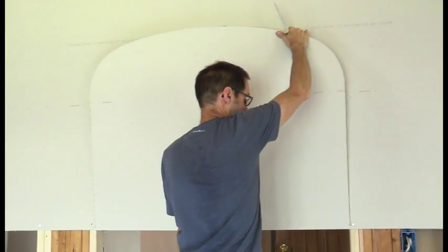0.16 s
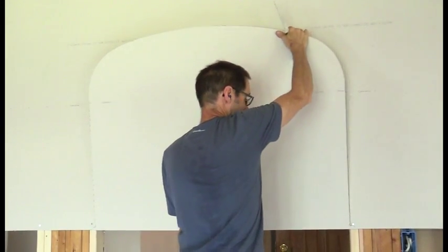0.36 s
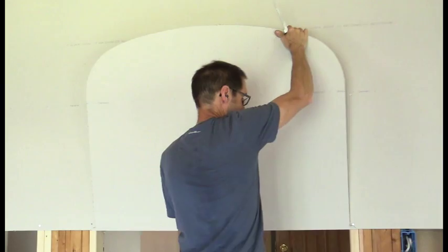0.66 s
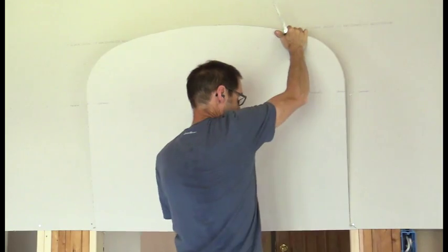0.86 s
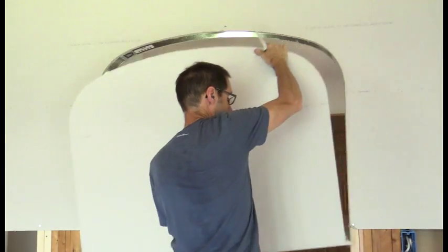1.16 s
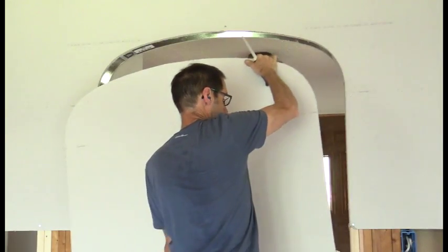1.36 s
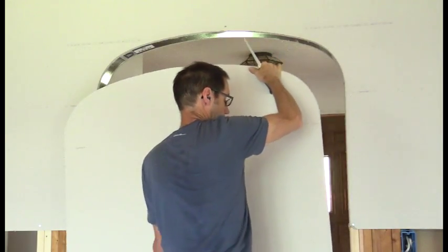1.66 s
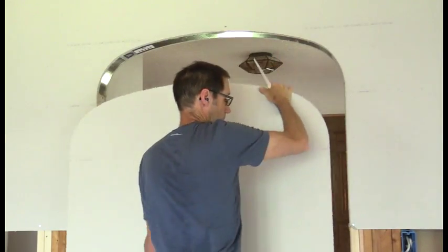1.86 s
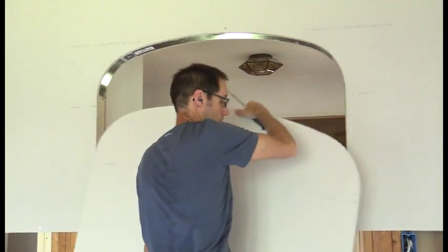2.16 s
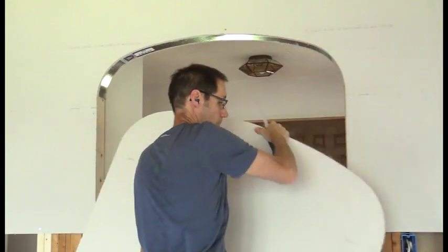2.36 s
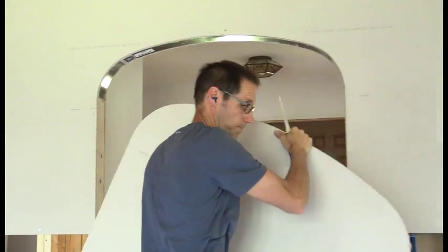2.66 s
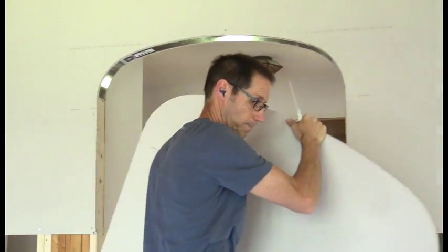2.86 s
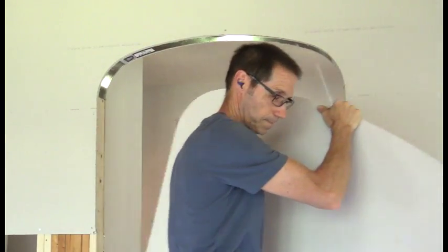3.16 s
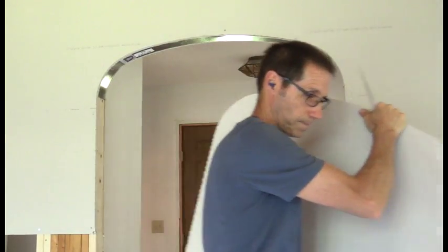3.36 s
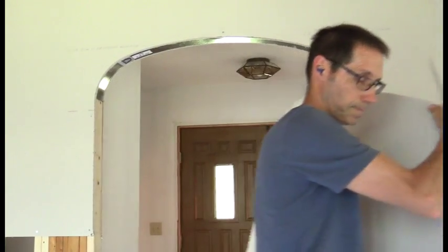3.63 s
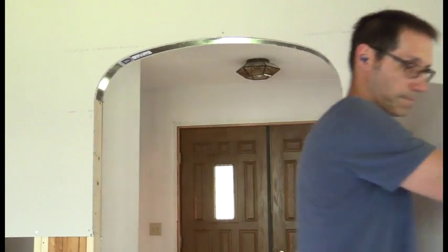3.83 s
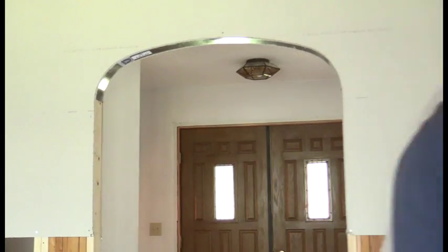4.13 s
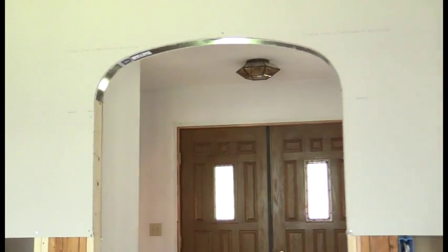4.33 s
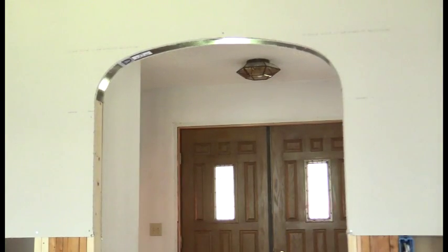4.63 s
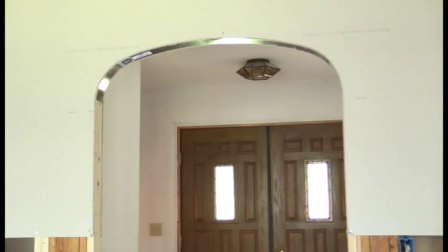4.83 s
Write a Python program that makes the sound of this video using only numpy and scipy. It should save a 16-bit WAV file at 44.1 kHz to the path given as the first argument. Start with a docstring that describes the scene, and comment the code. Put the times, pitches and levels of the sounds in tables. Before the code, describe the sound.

A saw blade rasps and ticks in drywall, the panel cracks and snaps free, scrapes down, knocks the floor, and heavy steps carry it off.

```python
"""Bare room: a hand saw works a drywall panel loose; its blade rasps, ticks and rings in the cut.
The panel tears free, its paper rips, its last strip snaps; it scrapes down and knocks on the floor.
Heavy steps carry it off; then the sound stops dead. Blows are pushes with dying grain showers, rubbing
is random grains under stroke pressure, sheets and boards are decaying modes. Most hits and the rubbing
have room echo; the low swings are dry, the close bump almost dry."""
import sys
import numpy as np
from scipy import signal
from scipy.fft import rfft, irfft
from scipy.io import wavfile
from scipy.ndimage import uniform_filter1d

SR = 44100
rng = np.random.default_rng(int(sys.argv[2]) if len(sys.argv) > 2 else 0)


def persist_wave(psi):
    """Save psi, clipped to +-1, as 16-bit WAV."""
    counts = np.round(np.clip(psi, -1, 1) * 32767).astype(np.int16)
    wavfile.write(sys.argv[1], SR, np.atleast_2d(counts).T)


N = 220191

# footfalls on gritty floor: start_s, heel_db, heel_to_sole_s, sole_db, bass_db, treble_db
STEPS = [(.005, -55.5, 0.14, -63, -7, -25), (.607, -48, .03, -46.5, -17, 4),
         (2.823, -44.5, .046, -48, -17.5, 1.5), (3.368, -29, .11, -35, -2.5, -4),
         (4.067, -28, .068, -29, -1.5, -8.5), (4.426, -48, 0.14, -52, -14, -11.5)]
# saw teeth catch, crumbs break off; the row at 1.487 s is the facing paper starting to tear: start_s, level_db,
# crumbling_s, treble_db
TICKS = [(.422, -54, 0.041, 13), (0.493, -41.5, 0.0068, 22), (.648, -45, 0.0041, 5),
         (0.72, -44, 0.02, -2.5), (.949, -43, .02, 5), (1.081, -38, 0.021, -3), (1.487, -41, 0.032, -14.5),
         (2.822, -56, 0.0026, -16)]
# blade strokes in the cut: start_s, length_s, level_db
RASP_STROKES = [(.43, 0.11, -59), (.67, 0.49, -51.5), (.925, 0.18, -40)]
# gypsum core breaks: start_s, level_db, crumbling_s, treble_db
CRACKS = [(.626, -42.5, 0.023, -21.5), (0.977, -29, 0.013, 7.5), (.981, -27, 0.013, 0),
          (1.0164, -29, 0.0044, -6.5), (1.024, -31, 0.0025, -8.5), (1.1033, -24, .003, 1),
          (1.604, -15, 0.0054, 1.5), (1.61, -22, 0.0066, -4.5)]
# weight comes down on the floorboards: start_s, level_db, contact_s
LOADS = [(.63, -33, 0.0083), (1.0, -37, 0.042), (2.51, -34, 0.021), (2.619, -30, 0.032),
         (3.376, -31, 0.072), (3.491, -21, 0.029), (3.808, -30, 0.0073), (3.865, -18.5, 0.016),
         (4.091, -9, 0.014)]
# panel knocks on wall and floor, jolts when carried: start_s, level_db, rattling_s, sheet_swing_db
KNOCKS = [(0.992, -31, .005, -22.5), (1.017, -37.5, .02, -18.5), (1.109, -24, 0.019, -22),
          (2.1483, -35, 0.00046, -37), (2.358, -17.5, 0.0056, -20.5), (2.388, -29, 0.011, -47),
          (2.44, -31.5, 0.0045, -41), (2.506, -37.5, .0018, -37), (2.612, -41, 0.0043, -36.5),
          (2.784, -48, 0.0087, -49), (3.415, -36, 0.022, -28), (3.479, -33.5, 0.0055, -22),
          (4.069, -34, 0.011, -36)]
# facing paper rips: start_s, level_db, ripping_s, bass_db, treble_db
RIPS = [(1.527, -30, 0.037, 3, -6), (1.556, -49, 0.025, 3, 7.5)]
# panel edge scrapes, lowered and dragged: start_s, length_s, level_db
SLIDE_STROKES = [(1.66, 0.09, -39), (1.82, .12, -57.5), (1.93, 0.35, -39.5), (2.37, 0.073, -42.5),
                 (2.66, 0.063, -47)]
# panel foot judders over the floor: start_s, length_s, level_db
JUDDER_STROKES = [(2.14, 0.074, -41.5), (2.72, 0.13, -58)]
# soft bump close to the microphone: start_s, level_db, shower_decay_s, bass_db, treble_db
BUMPS = [(3.858, -26.5, 0.0016, 1, 16)]

# spectra, each: freq_hz, relative_density_db
AIR_SPECTRUM = [(15, -30.5), (25, -6.5), (53, -0.5), (102, -4.5), (137, -6.5), (217, -18.5), (256, -8.5),
                (309, -17), (476, -16.5), (818, -21.5), (1400, -24), (7920, -31), (16000, -37.5)]
STEP_SPECTRUM = [(26, -5.5), (45, 1.5), (65, -4.5), (187, -9.5), (271, -12), (329, -13.5), (432, -22.5),
                 (552, -21.5), (948, -30), (1750, -31), (3750, -36), (4140, -34), (5840, -40),
                 (9550, -43.5), (16000, -50.5)]
TICK_SPECTRUM = [(100, -21), (600, -8), (1500, -16), (2800, -3), (4400, 0), (6000, -5.5), (9000, -6.5),
                 (12500, -6.5), (16000, -12.5)]
BLADE_SPECTRUM = [(100, 9.5), (500, -1.5), (1200, -9.5), (2200, -10.5), (2900, -5), (3600, -9), (4450, 0),
                  (5500, -6.5), (9000, -11.5), (16000, -17.5)]
CRACK_SPECTRUM = [(40, -27), (130, -13), (220, 4.5), (550, 0.5), (950, -3.5), (1800, 0), (3000, 0),
                  (4200, -0.5), (5500, -7), (8000, -15), (12000, -26), (16000, -38.5)]
KNOCK_SPECTRUM = [(40, -39), (100, -16.5), (170, -3.5), (240, 3.5), (300, -0.5), (420, 0.5), (600, -1),
                  (720, -4), (900, -7.5), (1100, -16), (1600, -22.5), (2500, -36.5), (6000, -55),
                  (16000, -77.5)]
PAPER_SPECTRUM = [(100, -18), (300, -9), (1200, -11), (3000, -3.5), (6500, -2), (8500, 0.5), (9900, 4.5),
                  (11500, -5.5), (16000, -16)]
EDGE_SPECTRUM = [(120, -7.5), (280, -7), (800, -11.5), (1700, -4.5), (2300, -6.5), (3000, 1.5),
                 (3800, -3.5), (4400, 1), (5200, -3.5), (8200, -7.5), (11000, -14.5), (16000, -22.5)]
BUMP_SPECTRUM = [(30, 8), (130, 2.5), (300, -0.5), (480, -22.5), (680, -4), (900, -24), (1150, -18),
                 (1600, -35.5), (3000, -45), (16000, -87)]

# mode clusters of the saw blade: center_hz, width_hz, relative_db, t60_s
STEEL_MODES = [(2750, 250, 4.5, 0.73), (4800, 190, -0.5, 1)]
# mode clusters of the panel: center_hz, width_hz, relative_db, t60_s
PANEL_MODES = [(291.3, 36, 0.5, 0.68), (378, 22, 4, 0.23), (508, 55, 3.5, 0.53), (687, 15, -1.5, 0.73),
               (761.4, 15, -1.5, 0.12), (879, 20, -8.5, 0.31)]
# low swings of the floorboards: freq_hz, relative_db, t60_s
BOARD_MODES = [(42.3, -17, 0.55), (65.6, 6.5, 0.17), (111.7, 4.5, 0.17)]
# low swings of the whole sheet: freq_hz, relative_db, t60_s
SHEET_MODES = [(101, -2, 0.4), (139, -3.5, 0.19), (231, 0.55, 0.25)]
# room decay: freq_hz, t60_s
ROOM_DECAY = [(50, 0.82), (120, 0.87), (260, 0.54), (700, 0.78), (1800, 0.71), (4500, 0.58), (8000, 0.51),
              (15000, 0.28)]
# first reflections: delay_s, gain (ratio)
REFLECTIONS = [(.0021, 0.27), (.0052, 0.33), (.0068, 0.31), (.0094, 0.17), (0.0145, .3), (0.0223, 0.39),
               (.0331, 0.23)]

BLADE_OUT_S, OFF_S = 1.3, 4.473
FIRM_DB = -26.5  # level of a firm knock


def amp(db):
    """Decibels to gain."""
    return 10 ** (np.asarray(db) / 20)


def unit(x):
    """Scales to rms 1."""
    return x / np.sqrt(np.mean(x ** 2) + 1e-20)


def read(points, hz):
    """Interpolates a table on a log-frequency axis."""
    f, value = np.transpose(points)
    return np.interp(np.log(hz + 1), np.log(f + 1), value)


def add(mix, start_s, sound):
    """Mixes a sound in at start_s."""
    part = mix[max(round(start_s * SR), 0):][:len(sound)]
    part += sound[:len(part)]


def colour(spectrum, bass_db=0, treble_db=0, bass_hz=450, treble_hz=3600, size=8192):
    """Causal impulse response of energy 1: spectrum plus bass and treble shelves."""
    hz = abs(np.fft.fftfreq(size, 1 / SR))
    db = read(spectrum, hz)
    db = db + bass_db / (1 + (hz / bass_hz) ** 2) ** 2
    db = db + treble_db * hz ** 2 / (hz ** 2 + treble_hz ** 2)
    minimum_phase = np.exp(np.conj(signal.hilbert(np.log(amp(db)))))
    response = np.fft.ifft(minimum_phase).real[:size // 2]
    return response / np.linalg.norm(response)


def through(x, response):
    """Convolves, keeping the scene's length."""
    return signal.oaconvolve(x, response)[:N]


def tail(build_s):
    """One second of dense room echo, energy 1; each band dies at its own speed."""
    hz, t, z = signal.stft(rng.standard_normal(SR), SR, nperseg=256)
    decay = np.exp(-np.log(1000) * t / read(ROOM_DECAY, hz)[:, None])
    echo = signal.istft(z * decay, SR, nperseg=256)[1][:SR]
    echo *= 1 - np.exp(-np.arange(SR) / SR / build_s)
    return echo / np.linalg.norm(echo)


def walls(early_db):
    """Direct sound and its first reflections."""
    response = np.zeros(SR // 20)
    response[0] = 1
    for delay_s, gain in REFLECTIONS:
        # the short window dulls the top octave
        add(response, delay_s, amp(early_db) * gain * signal.windows.hann(5) / 2)
    return response


def room(x, wet_db):
    """Adds the room's echo to a running sound."""
    return x + amp(wet_db) * through(x, tail(build_s=.008))


def shower(t, length_s, grains_per_s, grain_db, smooth_bins=41):
    """One sharp push and a dying shower of grains, spectrally flattened, energy 1."""
    grains = rng.standard_normal(len(t)) * amp(grain_db * rng.standard_normal(len(t)))
    grains *= np.exp(-t / length_s)
    # grain energy relative to the push grows with length
    force = grains / np.linalg.norm(grains) * np.sqrt(grains_per_s * length_s)
    force[0] += 1
    z = rfft(force, 2 * len(t))
    force = irfft(z / np.sqrt(uniform_filter1d(abs(z) ** 2, smooth_bins)))[:len(t)]
    return force / np.linalg.norm(force)


def blows(rows, spectrum, grains_per_s, grain_db, bass_hz, wet_db, early_db):
    """Grain showers through a body's colour; level is blow energy spread over 20 ms."""
    out, t = np.zeros(N), np.arange(SR // 4) / SR
    for start_s, level_db, length_s, bass_db, treble_db in rows:
        sound = amp(wet_db) * tail(0.0017 + length_s)  # fresh echo per blow
        direct = shower(t, length_s, grains_per_s, grain_db)
        add(sound, 0, signal.fftconvolve(direct, walls(early_db)))
        body = colour(spectrum, bass_db, treble_db, bass_hz)
        body = amp(level_db) * np.sqrt(SR / 50) * body
        add(out, start_s, signal.fftconvolve(sound, body))
    return out


def strokes(rows, attack_s, release_s):
    """Rubbing pressure: each stroke swells, holds and lets go."""
    pressure = np.zeros(N)
    for start_s, length_s, level_db in rows:
        t = np.arange(N) / SR - start_s
        swell = np.clip(t / attack_s, 0, 1) ** 2
        release = np.exp(-np.maximum(t - length_s, 0) / release_s)
        pressure += amp(level_db) * swell * release
    return pressure


def friction(pressure, spectrum, per_s, grain_db, judder_db):
    """Gypsum grains shear off at random, in clumps as the contact sticks and slips."""
    sizes = amp(grain_db * np.minimum(rng.exponential(1, N), 4)) * rng.choice([-1, 1], N)
    clumps = amp(judder_db * unit(uniform_filter1d(rng.standard_normal(N), size=300)))
    grains = unit(sizes * clumps * (rng.random(N) < per_s / SR))
    return through(grains * pressure, colour(spectrum))


def ring(force, modes, ring_db):
    """A sheet rings on in clusters of close modes after whatever shakes it."""
    t, response = np.arange(SR) / SR, 0
    for hz, width_hz, db, t60_s in modes:
        edges_hz = [hz - width_hz / 2, hz + width_hz / 2]
        band = signal.butter(2, edges_hz, "band", fs=SR, output="sos")
        cluster = signal.sosfilt(band, rng.standard_normal(2 * SR))[SR:]
        response += amp(db) * unit(cluster * np.exp(-np.log(1000) * t / t60_s))
    return amp(ring_db) * through(force, response / np.linalg.norm(response))


def swings(pushes, modes, focus, rise_s=0.0024):
    """A push bends a board; modes with period near the contact time swing most."""
    out, t = np.zeros(N), np.arange(SR) / SR
    hz, mode_db, t60_s = np.transpose(modes)[:, :, None]
    envelope = np.exp(-np.log(1000) * t / t60_s) * (1 - np.exp(-t / rise_s))
    waves = -envelope * np.sin(2 * np.pi * hz * t)
    for start_s, level_db, contact_s in pushes:
        share = amp(mode_db) * (hz * contact_s * np.exp(-hz * contact_s)) ** focus
        add(out, start_s, amp(level_db) * (share * waves).sum(0) / np.linalg.norm(share))
    return out


def room_air():
    """Steady room noise: coloured Gaussian noise at -55.5 dB rms."""
    return amp(-55.5) * unit(through(rng.standard_normal(N), colour(AIR_SPECTRUM)))


def footsteps():
    """Heel lands, foot rolls, sole slaps down, grit settles under the weight."""
    rows = []
    for start_s, heel_db, gap_s, sole_db, bass_db, treble_db in STEPS:
        sole_s = start_s + gap_s
        rows += [(start_s, heel_db, 0.014, bass_db, treble_db),
                 (start_s + .017, heel_db - 1.5, 0.56 * gap_s, bass_db, treble_db),
                 (sole_s, sole_db, 0.0046, bass_db, treble_db - 1.5),  # duller sole
                 (sole_s + .028, sole_db - 5.5, .055, bass_db, treble_db)]
    return blows(rows, STEP_SPECTRUM, grains_per_s=2200, grain_db=8.5, bass_hz=305,
                 wet_db=-0.5, early_db=-3.5)


def saw_ticks():
    """Teeth catch and crumbs break off, and the facing paper starts to tear; ticks vary in strength, length and
    treble only."""
    rows = [(start_s, db, length_s, -1.5, treble_db) for start_s, db, length_s, treble_db in TICKS]
    return blows(rows, TICK_SPECTRUM, grains_per_s=1200, grain_db=8, bass_hz=450,
                 wet_db=-11, early_db=-14)


def saw_rasp():
    """The blade rubs gypsum grains loose in the cut."""
    pressure = strokes(RASP_STROKES, attack_s=.03, release_s=.018)
    return friction(pressure, BLADE_SPECTRUM, per_s=1200, grain_db=5, judder_db=3)


def core_cracks():
    """The core breaks: full while the wall holds the panel, thin once it hangs free."""
    rows = []
    for start_s, level_db, length_s, treble_db in CRACKS:
        bass_db = 8 if start_s < BLADE_OUT_S else -12
        rows.append((start_s, level_db, length_s, bass_db, treble_db))
    return blows(rows, CRACK_SPECTRUM, grains_per_s=1900, grain_db=12.5, bass_hz=260,
                 wet_db=-5, early_db=-11)


def floor_thuds():
    """Weight bends the floorboards and they swing back."""
    return swings(LOADS, BOARD_MODES, focus=6.0)


def panel_knocks():
    """Hard knocks are bright, soft ones dull: the shelves follow the level."""
    rows = []
    for start_s, level_db, length_s, _ in KNOCKS:
        bass_db = 1.5 * max(FIRM_DB - level_db, 0)
        treble_db = 1.4 * (level_db - FIRM_DB)
        rows.append((start_s, level_db, length_s, bass_db, treble_db))
    return blows(rows, KNOCK_SPECTRUM, grains_per_s=210, grain_db=-3, bass_hz=330,
                 wet_db=-7.5, early_db=-0.5)


def sheet_swings():
    """Each knock bends the whole sheet; contact time doubles per 24 dB drop."""
    pushes = [(start_s, swing_db, 0.0064 * 2 ** ((FIRM_DB - level_db) / 24))
              for start_s, level_db, _, swing_db in KNOCKS]
    return swings(pushes, SHEET_MODES, focus=4.9)


def paper_rips():
    """Facing paper tears in short, bright grain showers."""
    return blows(RIPS, PAPER_SPECTRUM, grains_per_s=2500, grain_db=2, bass_hz=450,
                 wet_db=-6.5, early_db=-7.5)


def edge_slide():
    """The panel's edge scrapes in a dense stream of grains."""
    pressure = strokes(SLIDE_STROKES, attack_s=0.094, release_s=0.021)
    return friction(pressure, EDGE_SPECTRUM, per_s=5500, grain_db=0.0, judder_db=-1.2)


def foot_judder():
    """The panel's foot judders over the floor in sparse, uneven grains."""
    pressure = strokes(JUDDER_STROKES, attack_s=0.013, release_s=0.019)
    return friction(pressure, KNOCK_SPECTRUM, per_s=600, grain_db=9.0, judder_db=-2.0)


def close_bump():
    """A soft bump near the microphone, almost without room."""
    return blows(BUMPS, BUMP_SPECTRUM, grains_per_s=20, grain_db=3, bass_hz=450,
                 wet_db=-32, early_db=-30)


def scene():
    """Mixes all sources, the same in both channels."""
    air, steps, ticks, rasp = room_air(), footsteps(), saw_ticks(), saw_rasp()
    cracks, knocks = core_cracks(), panel_knocks()
    slide, judder = edge_slide(), foot_judder()
    # cracks shake blade and panel while the blade is in the cut
    jolts = cracks * (np.arange(N) < BLADE_OUT_S * SR)
    blade_ring = ring(ticks + rasp + jolts, STEEL_MODES, ring_db=-21.5)
    panel_ring = ring(knocks + judder + jolts, PANEL_MODES, ring_db=-25)
    thuds = floor_thuds() + sheet_swings()
    hits = steps + ticks + cracks + knocks + paper_rips() + close_bump() + thuds
    rubbing = room(rasp + slide + judder, wet_db=-2)
    mono = hits + blade_ring + panel_ring + rubbing + air
    return np.array([mono, mono])


def record(dry):
    """Microphone: 24 Hz high-pass, rounded peaks, dead stop at OFF_S, 16.2 kHz low-pass."""
    x = signal.sosfilt(signal.butter(2, 24, "high", fs=SR, output="sos"), dry)
    x = 1.3 * np.tanh(x / 1.3)
    x = x * (np.arange(N) < OFF_S * SR)
    low_pass = signal.firwin(511, 16200, window=("kaiser", 9), fs=SR)
    return signal.oaconvolve(x, low_pass[None], "same")


dry = scene()
out = record(dry)
persist_wave(out)
```